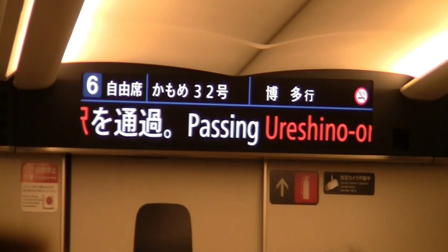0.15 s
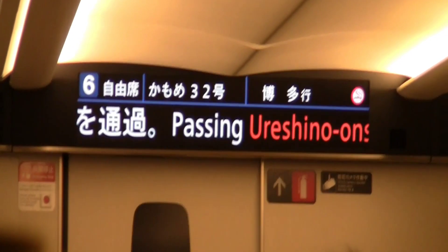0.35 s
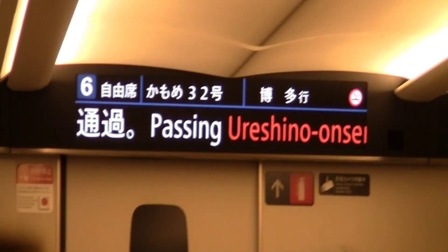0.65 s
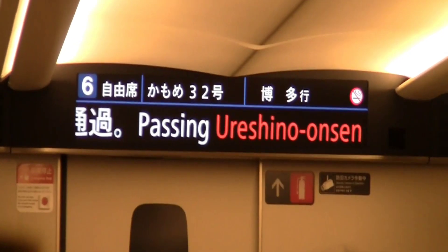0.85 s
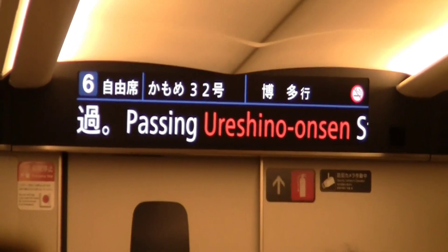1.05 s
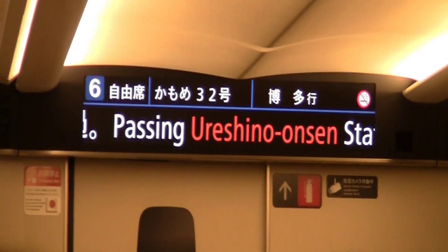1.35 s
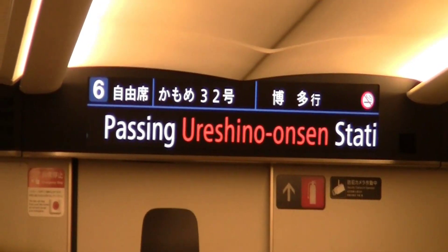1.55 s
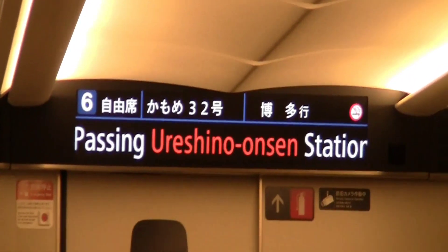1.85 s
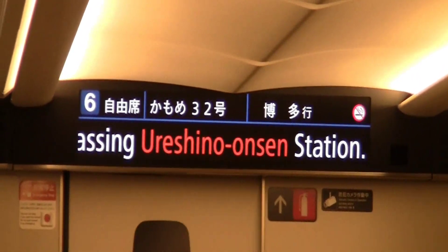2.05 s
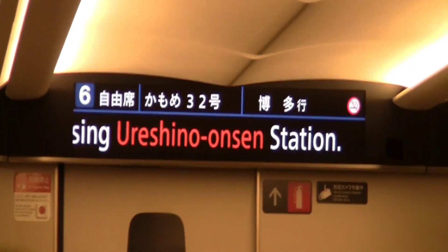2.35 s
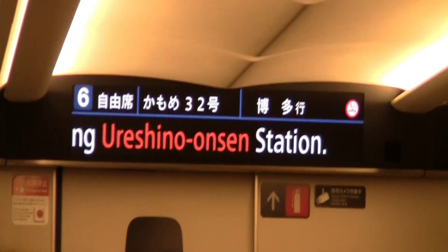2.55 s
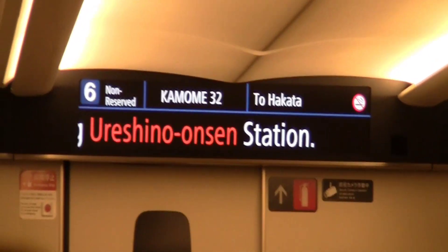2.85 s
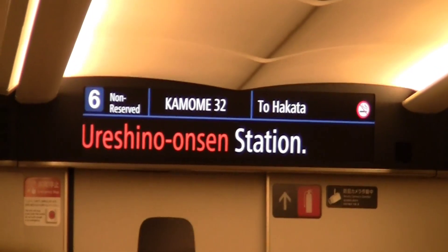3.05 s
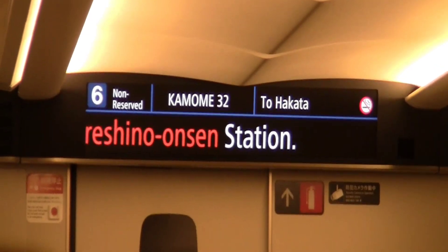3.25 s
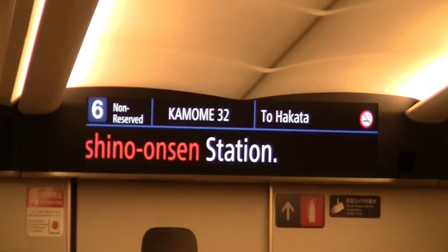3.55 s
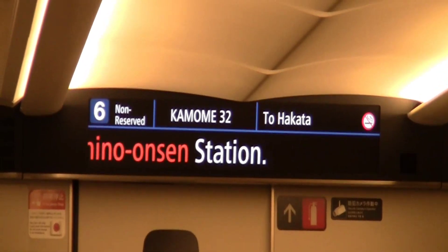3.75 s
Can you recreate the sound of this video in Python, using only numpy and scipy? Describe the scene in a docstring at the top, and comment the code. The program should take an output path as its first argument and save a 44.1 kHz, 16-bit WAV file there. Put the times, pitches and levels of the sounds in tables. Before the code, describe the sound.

Steady low rumble of a fast train heard inside a passenger car, with faint wavering whine

```python
"""A steady roar of wheels and air comes through the floor of a fast train's passenger car: shaped noise.
Car-body resonances colour it as narrow noise bands; a low drone of shaft orders is made of sines.
A wavering gear whine mixes a sine with narrow noise, and a faint mains buzz is a set of high harmonics.
A few light ticks from the trim are puffs of treble noise. Two close microphone ports pick it all up."""
import sys
import numpy as np
from scipy import signal
from scipy.fft import rfft, irfft
from scipy.io import wavfile
from scipy.ndimage import uniform_filter1d

SR = 44100
rng = np.random.default_rng(int(sys.argv[2]) if len(sys.argv) > 2 else 0)


def unload_wav(signal):
    """Save mono or channel-first audio to the path in sys.argv[1] as 16-bit WAV at rate SR, clipped to [-1, 1]."""
    wavfile.write(
        sys.argv[1],
        SR,
        np.round(np.clip(np.atleast_2d(signal).T, -1, 1) * 32767).astype(np.int16),
    )


N = 171990  # samples


def gain_of(db):
    """Level definition: 20 dB is a factor of ten in amplitude."""
    return 10 ** (np.asarray(db) / 20)


def evened(x):
    """Normalization to rms 1."""
    return x / np.sqrt(np.mean(x ** 2) + 1e-20)


def spectrum_at(points, hz):
    """Spectral envelope: straight lines on a log-frequency axis."""
    f, value = np.transpose(points)
    return np.interp(np.log(hz + 1), np.log(f + 1), value)


def level_over_time(points):
    """Temporal envelope: straight lines in time."""
    return np.interp(np.arange(N) / SR, *np.transpose(points))


def drift(top_hz, low_hz=.3):
    """Slow random modulation of rms 1: superposed sines of random phase, weaker towards top_hz."""
    t = np.arange(0, N + 256, 128) / SR
    slow = np.zeros(len(t))
    for f in np.geomspace(low_hz, top_hz, num=24):
        slow += np.sin(2 * np.pi * (f * t + rng.random())) / np.sqrt(f)
    return np.interp(np.arange(N) / SR, t, evened(slow))


def ringing(hz, width_hz):
    """Resonance driven by noise, rms 1; width_hz is the full width at half amplitude."""
    f = np.fft.rfftfreq(N, 1 / SR)
    response = 1 / (1 + (2 * (f - hz) / width_hz) ** 2)
    return evened(irfft(rfft(rng.standard_normal(N)) * response, N))


def tone(hz):
    """Frequency modulation: a sine of rms 1 whose phase integrates the pitch curve."""
    cycles = np.cumsum(hz * np.ones(N)) / SR + rng.random()
    return np.sqrt(2) * np.sin(2 * np.pi * cycles)


# Trim ticks: t/s, level/dB (decay line at onset, before the soft rise), decay time/s (to -60 dB)
TRIM_TICKS = [(.110, -55, .09), (.141, -61, .09), (.445, -53, .12), (1.403, -54, .07), (3.103, -56, .13),
              (3.351, -55.5, .1), (3.531, -61, .1), (3.781, -54, .14), (3.831, -60, .16)]
# Spectral envelope of a tick: f/Hz, relative level/dB
TICK_SPECTRUM = [(4000, -10), (6000, -2), (8000, -3), (9500, 0), (11000, -8), (12500, -17), (15500, -28)]
TICK_RISE_S, TICK_SIDE_DB = .008, -8  # side relative to mid


def ticks():
    """Exponential decay: soft-edged puffs of treble noise, as mid and side."""
    t, f = np.arange(N) / SR, np.fft.rfftfreq(N, 1 / SR)
    envelope = np.zeros(N)
    for onset, db, t60 in TRIM_TICKS:
        age = np.maximum(t - onset, 0)
        rise = np.minimum(age / TICK_RISE_S, 1)
        envelope += rise * gain_of(db - 60 * age / t60)
    colour = gain_of(spectrum_at(TICK_SPECTRUM, f)) * (f > 2000)
    hiss = irfft(rfft(rng.standard_normal((2, N))) * colour, N)
    return envelope * evened(hiss) * gain_of([[0], [TICK_SIDE_DB]])


MAINS_HZ, BUZZ_WAVER_DB = 60, 2.5  # waver: rms
# Mains harmonics that sound: harmonic number
MAINS_HARMONICS = [68, 102, 107, 135, 136, 137, 139, 140, 141, 143, 145, 170, 171, 174, 176, 177, 181]
# Their strengths in the same order: level/dB (rms in the mid, before the waver)
HARMONIC_LEVELS = [-78, -83, -84, -84, -84, -85, -85, -84, -87, -79, -81, -88, -87, -92, -91, -94, -92]


def buzz():
    """Harmonic series: thin high multiples of the mains frequency, each wavering in level."""
    total = np.zeros(N)
    for k, db in zip(MAINS_HARMONICS, HARMONIC_LEVELS):
        total += gain_of(db + BUZZ_WAVER_DB * drift(5)) * tone(k * MAINS_HZ)
    return total


# Gear whine envelope: t/s, level/dB (rms of sine and fuzz together in the mid, before the flutter)
WHINE_LEVEL = [(0.0, -62), (0.4, -53), (0.49, -42.5), (0.52, -53), (0.63, -46), (0.69, -60), (0.85, -51),
               (1.32, -55), (1.35, -43), (1.56, -57), (1.59, -47), (1.63, -57), (1.93, -46.5), (2.36, -65),
               (2.38, -54), (2.79, -50), (2.85, -54), (2.88, -46.5), (3.08, -60), (3.16, -44), (3.25, -50),
               (3.32, -48), (3.43, -53), (3.65, -49.5), (3.71, -66), (3.78, -50.5), (3.83, -60), (3.9, -53)]
WHINE_HZ, WHINE_WANDER_HZ, WHINE_FLUTTER_DB = 2552.5, 7, 2.5  # wander and flutter: rms
FUZZ_WIDTH_HZ, FUZZ_SHARE, OCTAVE_DB = 45, .45, -21  # share: amplitude of the narrow noise


def whine():
    """Modulated line spectrum: a gear tone that comes and goes, with a noise skirt and blurred octave."""
    pure = tone(WHINE_HZ + WHINE_WANDER_HZ * drift(14, 1))
    octave = gain_of(OCTAVE_DB) * ringing(2 * WHINE_HZ, 2 * FUZZ_WIDTH_HZ)
    envelope = gain_of(level_over_time(WHINE_LEVEL) + WHINE_FLUTTER_DB * drift(20, 5))
    fuzz = FUZZ_SHARE * ringing(WHINE_HZ, FUZZ_WIDTH_HZ)
    # The shares of sine and fuzz add to one in power.
    return envelope * (np.sqrt(1 - FUZZ_SHARE ** 2) * pure + fuzz + octave)


SHAFT_HZ, SHAFT_WANDER, DRONE_WAVER_DB = 62.75, 0.01614, 3  # wander: rms fraction of pitch; waver: rms
# Shaft orders 1, 2, 3: level/dB (rms before the waver)
SHAFT_ORDER_LEVELS = [-25.5, -29.5, -32]


def drone():
    """Rotational orders: multiples of one shaft rate share its pitch wander, but waver separately."""
    hz = SHAFT_HZ * (1 + SHAFT_WANDER * drift(8, 1))
    total = np.zeros(N)
    for order, db in enumerate(SHAFT_ORDER_LEVELS, start=1):
        total += gain_of(db + DRONE_WAVER_DB * drift(6.2, 0.98)) * tone(order * hz)
    return total


# Car-body resonances: f/Hz, width/Hz, level/dB (rms)
BODY_MODES = [(67.7, 13, -27), (102, 6, -28.5), (124.3, 8.6, -25.5), (155.7, 13, -33), (192.9, 7, -29),
              (245, 40, -31.5), (315, 7.3, -35), (1988, 49, -55), (7650, 150, -76.5)]


def body():
    """Modal superposition: floor, walls and the air of the car sound at their own pitches."""
    return sum(gain_of(db) * ringing(hz, width) for hz, width, db in BODY_MODES)


# Spectral envelope of the rolling and air noise: f/Hz, relative level/dB (density)
ROAR_SPECTRUM = [(15, -63.5), (25, -38.5), (40, -14), (54, -6), (88, -5), (128, -1), (161, -5.5), (178, -9),
                 (200, -6), (225, -9), (286, -12), (346, -13), (385, -13.5), (500, -17.5), (697, -22.5),
                 (898, -23), (1020, -26.5), (1600, -34.5), (2190, -39.5), (2590, -39), (2940, -44.5),
                 (3960, -51.5), (5000, -55.5), (6000, -59), (7600, -61.5), (9000, -65.5), (10300, -68.5),
                 (11000, -76.5), (12000, -78.5), (13000, -83.5)]
# Stereo width of the nearly mono bass: f/Hz, level/dB (side relative to mid)
BASS_SIDE = [(25, -56), (60, -58), (75, -48), (100, -37), (130, -34), (170, -29)]
# Stereo width above the bass: f/Hz, level/dB (side relative to mid)
UPPER_SIDE = [(230, -21), (370, -22), (900, -18), (2200, -13.5), (5000, -10.5), (9000, -8), (11000, -2),
              (15000, -1)]
ROAR_DB = -16.5  # rms of the mid
TOP_FALL_DB, TOP_HZ = -3, 15700  # the spectrum falls this much further from its last point to TOP_HZ
# rms unevenness; patches and flicker fade out below FLICKER_HZ, where half of their dB remains
PATCH_DB, SWELL_DB, FLICKER_DB, FLICKER_HZ = .7, .3, .95, 4500


def roar():
    """Shaped broadband noise: rolling and air as mid and side, with patches, treble flicker and swell."""
    f = np.fft.rfftfreq(N, 1 / SR)
    spectrum = ROAR_SPECTRUM + [(TOP_HZ, ROAR_SPECTRUM[-1][1] + TOP_FALL_DB)]
    colour = gain_of(spectrum_at(spectrum, f)) * (f > 15)
    side_gain = gain_of(spectrum_at(BASS_SIDE + UPPER_SIDE, f))
    noise = rfft(rng.standard_normal((2, N)))
    pair = irfft(noise * colour * [np.ones(len(f)), side_gain], N)

    hz, t, z = signal.stft(pair, SR, nperseg=512, noverlap=384, boundary="odd")
    patches = rng.standard_normal((len(t), len(hz))).T
    patches = uniform_filter1d(patches, size=6, axis=0)  # across frequency
    patches = evened(uniform_filter1d(patches, size=16, axis=1))  # along time
    flicker = evened(uniform_filter1d(rng.standard_normal(len(t)), size=6))  # common to all bands
    treble_share = 1 / (1 + (FLICKER_HZ / (hz + 1)) ** 4)
    z = z * gain_of(treble_share[:, None] * (PATCH_DB * patches + FLICKER_DB * flicker))
    pair = signal.istft(z, SR, nperseg=512, noverlap=384)[1][:, :N]

    pair = pair * gain_of(SWELL_DB * drift(1.7))
    return gain_of(ROAR_DB) * pair / np.sqrt(np.mean(pair[0] ** 2))


TONES_SIDE = .2  # side/mid amplitude: the whine and the buzz sit a little to one side


def scene():
    """Mid-side decoding: left is the sum of mid and side, right their difference."""
    mid, side = roar() + ticks()
    tones = whine() + buzz()
    mid = mid + body() + drone() + tones
    side = side + TONES_SIDE * tones
    return np.array([mid + side, mid - side])


# Colour difference of the two ports: f/Hz, level/dB (left relative to right)
PORT_BALANCE = [(150, 0), (230, -.6), (370, -.9), (580, -.5), (1400, -.4), (2200, -.1), (9000, -.1),
                (12000, -2)]
EDGE_HZ = 15730  # upper band limit


def record(dry):
    """Linear filtering: the two ports differ a little in colour, then a low-pass limits the band."""
    edge = 4096  # samples of mirrored margin
    wide = np.pad(dry, ((0, 0), (edge, edge)), mode="reflect", reflect_type="odd")
    length = wide.shape[1]
    half_balance = spectrum_at(PORT_BALANCE, np.fft.rfftfreq(length, 1 / SR)) / 2
    ports = irfft(rfft(wide) * gain_of([half_balance, -half_balance]), length)
    low_pass = signal.firwin(1023, EDGE_HZ, window=("kaiser", 9), fs=SR)
    return signal.oaconvolve(ports, low_pass[None], "same", axes=1)[:, edge:edge + N]


dry = scene()
out = record(dry)
unload_wav(out)
```